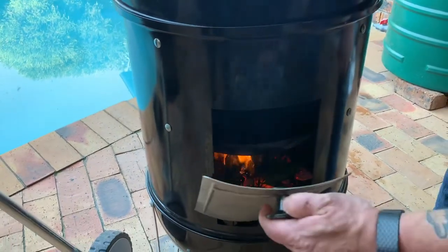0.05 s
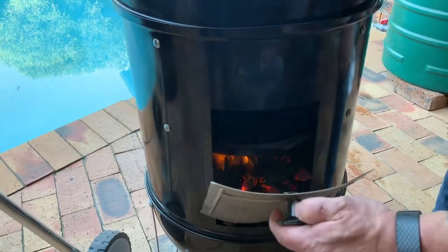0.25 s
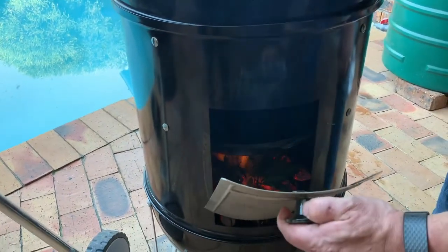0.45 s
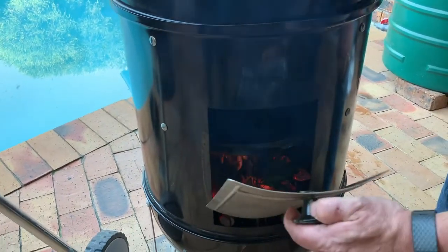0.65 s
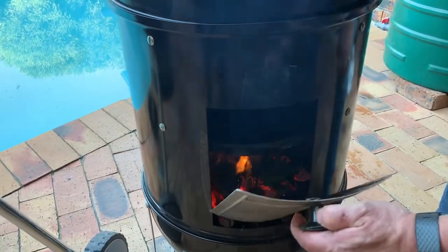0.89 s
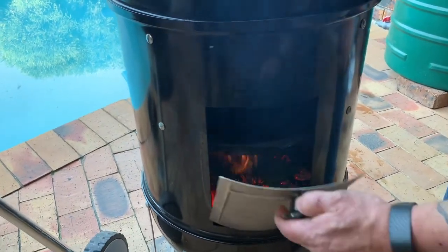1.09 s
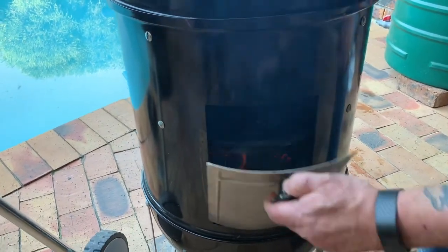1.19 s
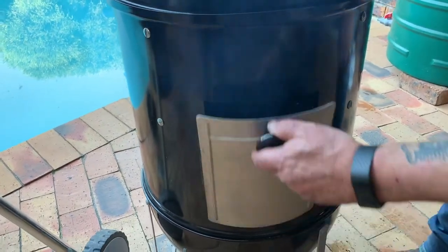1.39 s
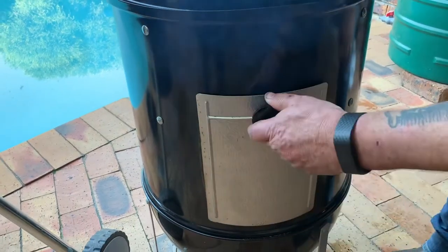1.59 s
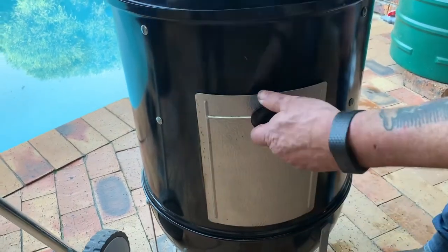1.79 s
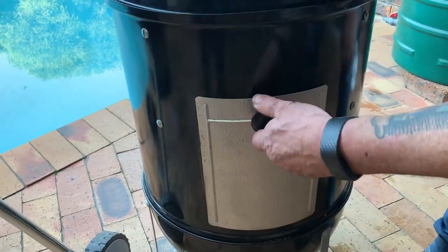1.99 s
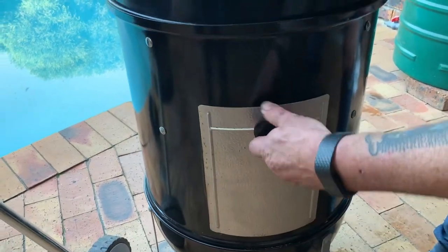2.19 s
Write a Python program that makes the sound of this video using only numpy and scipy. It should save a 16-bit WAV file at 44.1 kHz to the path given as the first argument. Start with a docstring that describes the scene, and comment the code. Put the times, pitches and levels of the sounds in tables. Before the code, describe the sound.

Metal smoker door clattering against its opening, then sliding closed with dull thuds as embers pop.

```python
"""Closing a barrel smoker

Outdoors, a stereo microphone close by the smoker. Embers pop, tick and sizzle inside while the loose
sheet-metal door scrapes and clangs on the rim of the opening, then slides home with dull thuds.
The crackle fades as the door covers it; a low open-air rumble lies under everything."""
import sys
import numpy as np
from scipy import signal
from scipy.fft import rfft, irfft, next_fast_len
from scipy.io import wavfile
from scipy.ndimage import uniform_filter1d

SR = 44100
rng = np.random.default_rng(int(sys.argv[2]) if len(sys.argv) > 2 else 0)


def file_out(sig):
    """Save sig as 16-bit WAV at sys.argv[1]."""
    # one column per channel
    cols = np.atleast_2d(sig).T
    # limit, then scale
    lim = np.clip(cols, -1, 1)
    pcm = np.round(lim * 32767).astype(np.int16)
    wavfile.write(sys.argv[1], SR, pcm)


N = 99225

CORNER, EDGE, RIM = range(3)  # places where the door strikes
# stereo image of the door and the open air: f/Hz, left-right correlation
OUTSIDE_IMAGE = [(100, 0.98), (300, 0.7), (2000, 0.47), (4500, 0.14), (9000, 0.61)]
# stereo image of the fire: f/Hz, left-right correlation
FIRE_IMAGE = [(2000, 0.37), (4500, 0.09), (9000, 0.89)]


def amp(db):
    """Decibels to gain."""
    return 10 ** (np.asarray(db) / 20)


def read(points, hz):
    """Interpolates a table over log frequency."""
    f, value = np.transpose(points)
    return np.interp(np.log(hz + 1), np.log(f + 1), value)


def add(mix, start_s, sound):
    """Mixes a stereo sound in at start_s."""
    part = mix[:, max(round(start_s * SR), 0):][:, :sound.shape[1]]
    part += sound[:, :part.shape[1]]


def colour(x, points, tilt_db=0):
    """Minimum-phase filter through (f/Hz, gain/dB) points, tilted by tilt_db per octave about 1 kHz."""
    size = next_fast_len(x.shape[1] // 2 + 2048) * 2
    hz = np.fft.rfftfreq(size, 1 / SR)
    octaves = np.log2(np.maximum(hz, 100) / 1000)
    cepstrum = irfft(np.log(amp(read(points, hz) + tilt_db * octaves)))
    cepstrum[1:size // 2] *= 2
    cepstrum[size // 2 + 1:] = 0
    return irfft(rfft(x, size) * np.exp(rfft(cepstrum)))[:, :x.shape[1]]


def noise(size, image):
    """White stereo noise with the left-right correlation given by image."""
    a, b = rfft(rng.standard_normal((2, size)))
    alike = np.clip(read(image, np.fft.rfftfreq(size, 1 / SR)), -1, 1)
    mid, side = a * np.sqrt((1 + alike) / 2), b * np.sqrt((1 - alike) / 2)
    return irfft(np.array([mid + side, mid - side]), size)


def fade(t, t60):
    """Holds until t = 0, then falls 60 dB every t60 seconds."""
    return np.exp(-np.log(1000) * np.maximum(t, 0) / t60)


def open_air(drift_db=3.5):
    """Low outdoor rumble and faint hiss, drifting in patches of time and frequency."""
    # outdoor background: f/Hz, level/dB
    background = [(20, -28), (45, -14), (78, -12.5), (115, -20), (170, -27.5), (240, -31), (380, -44.5),
                  (500, -49), (610, -33), (760, -57), (1000, -44.5), (2000, -65.5), (4000, -50),
                  (5500, -63), (9000, -52), (16000, -75)]
    spectra = signal.stft(noise(N, OUTSIDE_IMAGE), nperseg=1024)[2]
    patches = rng.standard_normal(spectra.shape[1:])
    for axis in (0, 1):
        patches = uniform_filter1d(patches, size=8, axis=axis)
    drifting = signal.istft(spectra * amp(drift_db * patches / patches.std()))[1]
    return colour(drifting[:, :N], background)


def ember_pop(rise_s=0.00037, decay_s=0.0018, echo_s=0.0033, echo_decay_s=0.0051, size=6144):
    """An ember snaps at its own pitch; the barrel's back wall returns it and it dies away inside."""
    t = np.arange(size) / SR
    direct = rng.choice([-1., 1.], size) * np.minimum(t / rise_s, 1) * np.exp(-t / decay_s)
    echo = amp(-9) * (t > echo_s) * np.exp(-np.maximum(t - echo_s, 0) / echo_decay_s)
    tail = amp(-13) * fade(t, t60=0.13)
    snap = direct + noise(size, FIRE_IMAGE) * np.hypot(echo, tail)
    hz, width = 4360 * 2 ** (1.23 * rng.standard_normal()), 2 ** 0.43
    return colour(snap, [(hz / width, -1), (hz, 5.5), (hz * width, -1)])


def fire(ticks_per_s=90, resonance_step_hz=104.55):
    """Loud pops over small ticks and a sizzle, coloured by the barrel's crowded air resonances."""
    # single loud embers: t/s, level/dB, body up to 2.2 kHz/dB
    embers = [(.0056, -14.5, 0.5), (0.0245, -14.5, 3.5), (0.0603, -22, -11), (0.0814, -10, -21),
              (0.1238, -9, -2), (0.1837, -13, -19), (0.2047, -7, 4), (.219, 1.5, -2), (0.244, -10, 6),
              (0.2586, -8.5, -24), (0.2676, -11, 5), (0.3207, -1, 2), (0.444, -6, -2.5), (0.465, -5, 0.5),
              (.5013, -17, -20), (.508, -9, -4), (0.5435, -14, 9.5), (0.5725, -10.5, 2),
              (0.6219, -5.5, 6.5), (0.6797, -2.5, -6), (0.7108, 1, -27), (0.7386, -9.5, -6),
              (0.7642, 4.5, 0), (.7849, -9.5, -2), (0.8059, -4, -2), (0.885, -12, -7), (1.2118, 1, 1.5),
              (1.2546, -13, 1), (1.3107, -7.5, -8), (1.4084, -9, 0), (1.454, -16, -3), (1.5846, -16.5, -19),
              (1.652, -14, -16), (1.7007, -14.5, -7), (1.8791, -14, -14), (1.9311, -14, -2.5),
              (1.994, -17.5, 1.5), (2.047, -21.5, 3.5), (2.0995, -16.5, -11), (2.163, -21.5, 1)]
    # tone of the whole fire: f/Hz, gain/dB
    fire_tone = [(100, -22.5), (420, -29), (660, -9.5), (830, -20.5), (1200, -17.5), (1800, -9),
                 (2450, -13), (3300, -17.5), (4600, -17), (6800, -10.5), (9000, -11.5), (12000, -11.5),
                 (14500, -14.5), (16000, -21)]
    # sizzle ahead of that tone: f/Hz, level/dB
    sizzle_tone = [(600, -31), (2000, -30.5), (4000, -32), (9000, -37.5), (14000, -31.5)]
    # ticks and sizzle sinking as the door covers them: t/s, level/dB
    covering = [(0, 5), (.28, 7.5), (0.601, 5.5), (1.15, 2.5), (1.42, -1.5), (1.552, -4), (1.8, -6.5),
                (2.25, -8.5)]
    pops, ticks = np.zeros((2, 2, N))
    for start_s, db, body_db in embers:
        add(pops, start_s, amp(db) * colour(ember_pop(), [(2200, body_db), (8000, 0)]))
    sizzle = colour(noise(N, FIRE_IMAGE), sizzle_tone)
    resonances = [(k * resonance_step_hz, db) for k, db in enumerate(rng.normal(0, 2, 160))]
    ticking = rng.random(N) < ticks_per_s / SR
    tick_db = -28 + 3 * np.minimum(rng.exponential(1, N), 3)
    for at in np.flatnonzero(ticking):
        add(ticks, at / SR, amp(tick_db[at]) * ember_pop())
    opening = amp(np.interp(np.arange(N) / SR, *np.transpose(covering)))
    crackle = pops + opening * (ticks + sizzle)
    return colour(colour(crackle, fire_tone), resonances)


def sheet_modes(count=620):
    """The door's crowded weak modes: frequencies and uneven heights, at unit total power."""
    position, strength = rng.random(count), rng.standard_normal(count)
    hz = 90 + 16000 * position ** 1.6
    height = amp(np.clip(strength, -2, 1.5)) * position ** .3
    return hz, height / np.sqrt(np.sum(height ** 2) / 2)


def sheet_wash(hz, height, size):
    """All the weak modes ring together, the high ones dying first."""
    # ring time of the sheet: f/Hz, t60/s
    ring_times = [(100, 0.82), (500, 0.51), (2000, 0.6), (4000, 0.5), (8000, 0.38), (15000, 0.18)]
    phase = rng.uniform(0, 2 * np.pi, len(hz))
    alike = np.clip(read(OUTSIDE_IMAGE, hz), 1e-2, 1)
    apart = np.sqrt(-2 * np.log(alike)) * rng.standard_normal(len(hz))
    lines = np.zeros((2, size // 2 + 1), complex)
    bins = np.round(hz * size / SR).astype(int)
    lines[:, bins] = height * size / 2 * np.exp(1j * np.array([phase, phase + apart]))
    f, t, spectra = signal.stft(irfft(lines), SR, nperseg=256)
    return signal.istft(spectra * fade(t, read(ring_times, f)[:, None]), SR)[1][:, :size]


def chatter(size, slips_per_s=91, slip_s=0.007, power_share=0.78):
    """Uneven force of an edge that catches and slips on another."""
    slips = rng.random(size) < slips_per_s / SR
    force = signal.lfilter([1], [1, -np.exp(-1 / (slip_s * SR))], slips)
    return np.sqrt(1 - power_share + power_share * force ** 2 / (np.mean(force ** 2) + 1e-12))


def partials(t, hz, phase, apart, height=1):
    """Sum of sines whose left and right phases differ by `apart` radians."""
    angle = 2 * np.pi * hz * t + phase
    return np.array([(height * np.sin(angle + side * apart)).sum(0) for side in (-.5, .5)])


def door_knock(sheet, place, rise_s, contact_s, ring_db, clash_db, *band_db, size=28672):
    """A chattering contact sets the metal ringing in clear modes and a dense wash of weaker ones."""
    # door and barrel modes: f/Hz, level/dB struck at the corner, at the edge, at the rim, t60/s
    modes = [(122, -23, -25, -16, .36), (166, -27, -22, -20, .25), (562, -42, -35, -40, .4),
             (607, -26, -38, -38, .22), (678, -19, -31, -22, .28), (775, -21, -36, -35, .2),
             (797, -46, -36, -44, .7), (1065, -26, -35, -36, .36), (1176, -18.5, -36, -21, .33),
             (1195, -40, -36, -36, .6), (1404, -25, -28, -36, .28), (1507, -44, -33, -40, .7),
             (1647, -38, -29, -31, .4), (1788, -27, -30, -31, .45), (1845, -38, -26, -22, .39),
             (1876, -32, -32, -23, .36), (2003, -37, -36, -34, .45), (2027, -29, -35, -34, .35),
             (2290, -31, -41, -14, .3), (2363, -29, -42, -40, .35), (2417, -37, -29, -36, .2),
             (2488, -28, -27, -23, .25), (2659, -44, -36, -42, .35), (3060, -44, -37, -42, .3),
             (4070, -39, -41, -33, .35), (4236, -48, -35, -44, .28), (4657, -50, -44, -46, .5)]
    # tone of the sheet's wash and clash: f/Hz, gain/dB
    sheet_tone = [(40, -33), (80, -26), (140, 1), (260, -8), (450, -12.5), (700, -8), (1250, -12),
                  (1950, -3), (2500, -8), (3200, -15), (4300, -16.5), (5600, -19.5), (8500, -18),
                  (15000, -22)]
    t = np.arange(size) / SR
    hz, *struck_db, t60 = np.transpose(modes)[:, :, None]
    phase = rng.uniform(0, 2 * np.pi, hz.shape)
    apart = 0.75 * np.minimum(hz / 600, 1.4) * rng.choice([-1, 1], hz.shape)
    ring = partials(t, hz, phase, apart, amp(ring_db + struck_db[place]) * fade(t, t60))
    clash = amp(clash_db) * np.exp(-t / contact_s) * chatter(size) * noise(size, OUTSIDE_IMAGE)
    attack = np.minimum(t / rise_s, 1)
    clatter = colour(attack * (sheet_wash(*sheet, size) + clash), sheet_tone)
    bands = list(zip((170, 650, 2100, 6500), band_db))
    return attack * ring + colour(clatter, bands)


def edge_ping(centre_hz, spread_octaves=0.35, count=12, size=4096):
    """The edge catches and a small patch of it rings in a cluster of short, unrelated partials."""
    t = np.arange(size) / SR
    hz = centre_hz * 2 ** (spread_octaves * rng.uniform(-0.86, 1, (count, 1)))
    phase, apart = rng.uniform(0, 2 * np.pi, (count, 1)), rng.standard_normal((count, 1))
    return partials(t, hz, phase, apart) / np.sqrt(count / 2) * fade(t, t60=0.13)


def door_seating(sheet, slide_s, scrape_db, tilt_db, ring_t60, boom_db, boom_hz, size=16384):
    """The door scrapes and bumps to a stop, damped by the hand, and thumps the air in the barrel."""
    # tone of the held door: f/Hz, gain/dB
    scrape_tone = [(50, -30), (120, -6.5), (230, -4), (420, -9.5), (800, -12.5), (980, -22.5),
                   (1400, -20.5), (2600, -31), (4000, -42.5), (8000, -49), (15000, -64)]
    stop_s, bump_s, boom_rise_s, boom_hold_s = 0.0065, 0.0084, 0.0094, 0.013
    t = np.arange(size) / SR
    since_stop = np.maximum(t - slide_s, 0)
    pressure = 0.57 + 0.43 * np.minimum(t / slide_s, 1)
    rub = noise(size, OUTSIDE_IMAGE) * chatter(size) * np.exp(-since_stop / stop_s)
    ring = amp(-1.5) * fade(since_stop, ring_t60) * sheet_wash(*sheet, size)
    bump = amp(-1) * (since_stop > 0) * np.exp(-since_stop / bump_s) * noise(size, OUTSIDE_IMAGE)
    metal = colour(pressure * (rub + ring), scrape_tone, tilt_db)
    metal += colour(bump, scrape_tone, tilt_db - 2)  # duller than the scrape
    swell = np.minimum(since_stop / boom_rise_s, 1) * fade(since_stop - boom_hold_s, t60=0.14)
    boom = swell * np.sin(2 * np.pi * boom_hz * since_stop)
    return amp(scrape_db) * metal + amp(boom_db) * boom


def scene():
    """At the smoker: the door knocks, catches and slides home over the fire and the open air."""
    # loose door on the barrel: t/s, place, rise/s, contact/s, ring/dB, clash/dB,
    # then the clatter's bass/dB, low-mid/dB, high-mid/dB, treble/dB
    knocks = [(0.05, EDGE, 0.012, 0.0092, -19.5, 19.5, -35, -34, -26.5, -24.5),
              (0.322, RIM, 0.0062, 0.023, -10, 0, -6, -15.5, -16.5, -8),
              (.659, CORNER, 0.0057, 0.0093, 1, 7, -6.5, -2.5, -10.5, -10.5),
              (.812, EDGE, 0.01, 0.02, -2, 5, -6, -11, -17, -10),
              (0.9256, EDGE, 0.0095, 0.0055, 0.5, 13, -8, -2.5, -10, -1),
              (0.9969, EDGE, 0.0027, 0.016, 2, 17, -12.5, -10, -14.5, -11)]
    # the edge catching: t/s, level/dB, centre f/Hz
    catches = [(.329, -27, 2000), (.9415, -30, 2540), (1.0185, -28, 3255), (1.5795, -37, 2495),
               (1.7385, -37, 2596)]
    # pushes home: t/s, slide/s, scrape/dB, tilt/(dB per octave), ring t60/s, boom/dB, boom f/Hz
    pushes = [(1.479, 0.0147, -3, 1, 0.82, -11.5, 105), (1.578, 0.0017, -11.5, 5, 0.7, -27.5, 134),
              (1.741, 0.018, -5, 3.5, 0.23, -17.5, 90.7), (2.036, 0.0057, -50, 2, 0.22, -28.5, 79),
              (2.178, 0.011, -18, 2.5, 0.66, -27.5, 94.6)]
    mix, sheet = open_air(), sheet_modes()
    for start_s, *blow in knocks:
        add(mix, start_s, door_knock(sheet, *blow))
    for start_s, db, hz in catches:
        add(mix, start_s, amp(db) * edge_ping(hz))
    for start_s, *push in pushes:
        add(mix, start_s, door_seating(sheet, *push))
    return mix + fire()


def record(dry):
    """Stereo microphone: low cut, ports of unequal colour and phase, a treble dip and a band limit."""
    # low cut: f/Hz, gain/dB
    low_cut = [(20, -4), (42, -21), (75, -4), (200, 0.5)]
    # balance of the ports: f/Hz, left over right/dB
    balance = [(60, -3), (200, -2), (700, -2.5), (1300, 1.1), (2400, .4), (4400, -4), (8000, -0.2),
               (15000, .1)]
    # phase between the ports: f/Hz, left lead/rad
    left_lead = [(500, 0), (1100, 0.59), (1700, -1.06), (4000, 0.94), (7400, 2), (9400, 0), (11650, -3.5),
                 (13400, -5), (14500, -11.5), (15800, -4)]
    dip_hz, dip_width_hz, limit_hz = 11570, 560, 15750
    hz = np.fft.rfftfreq(2 * N, 1 / SR)
    dip_db = -14 * np.exp(-((hz - dip_hz) / dip_width_hz) ** 2)
    side = np.array([[.5], [-.5]])
    ports = amp(dip_db + side * read(balance, hz)) * np.exp(1j * side * read(left_lead, hz))
    heard = irfft(rfft(colour(dry, low_cut), 2 * N) * ports)[:, :N]
    band_limit = signal.firwin(255, limit_hz, window=("kaiser", 9), fs=SR)
    return signal.oaconvolve(heard, band_limit[None], "same")


dry = scene()
out = record(dry)
file_out(out)
```